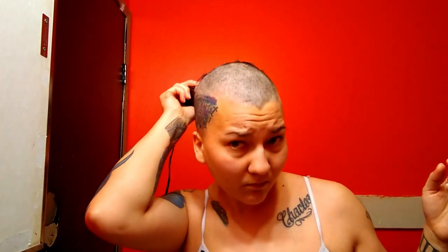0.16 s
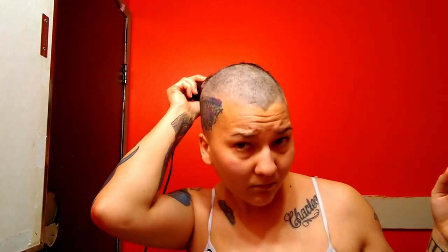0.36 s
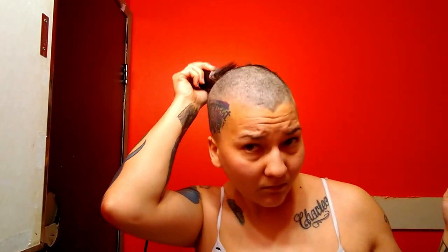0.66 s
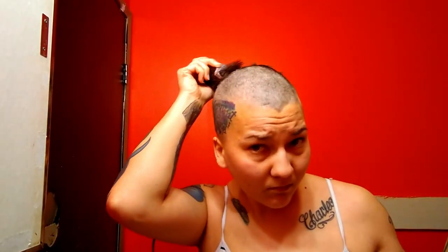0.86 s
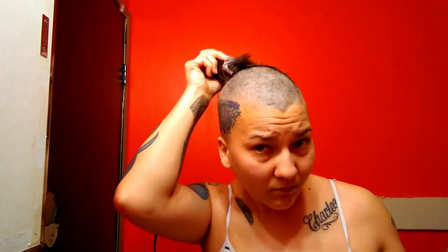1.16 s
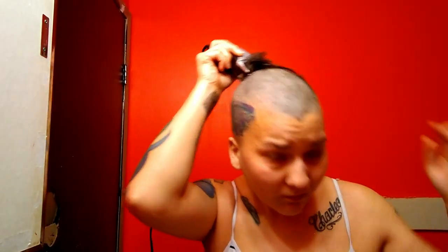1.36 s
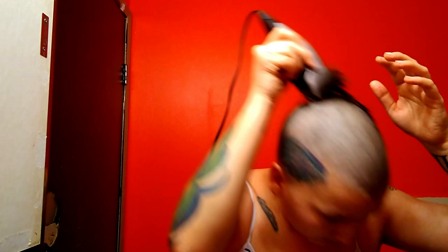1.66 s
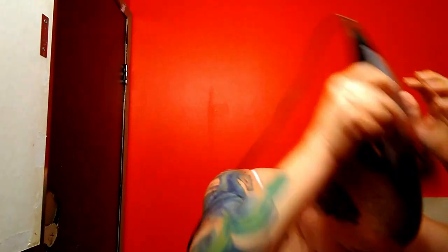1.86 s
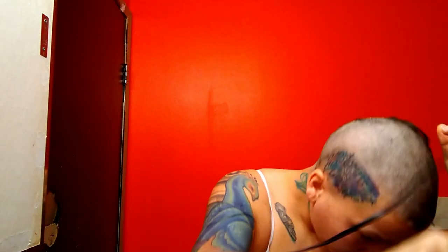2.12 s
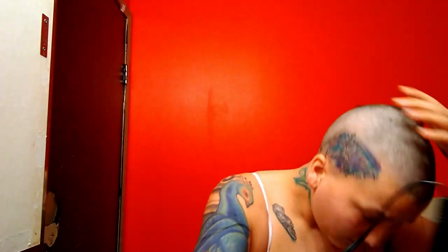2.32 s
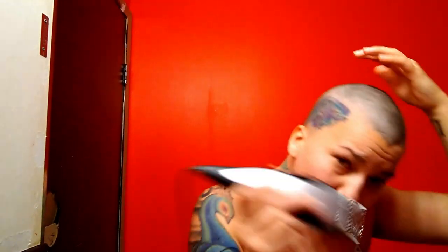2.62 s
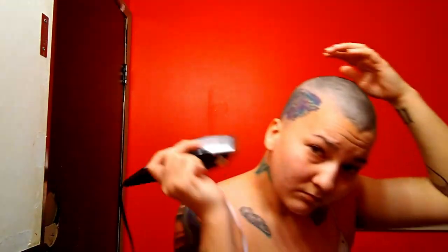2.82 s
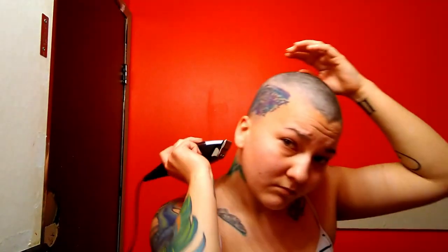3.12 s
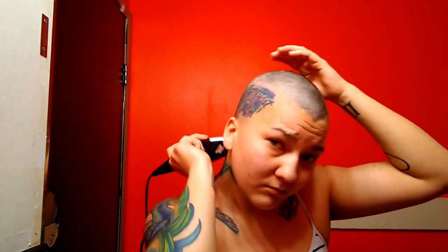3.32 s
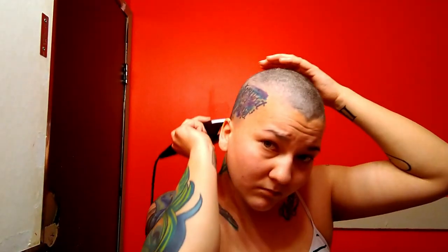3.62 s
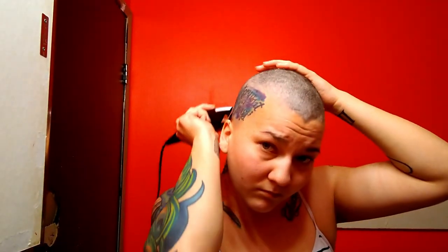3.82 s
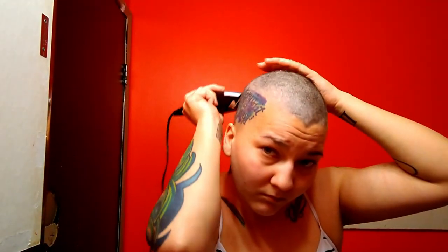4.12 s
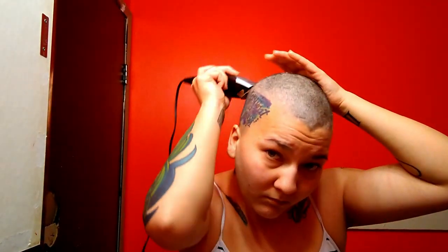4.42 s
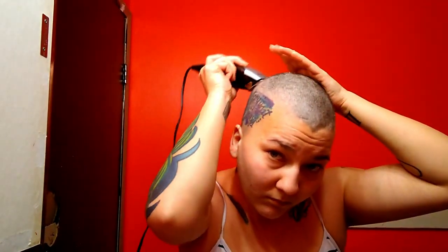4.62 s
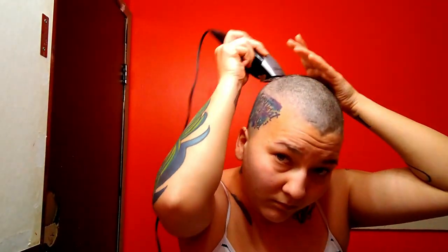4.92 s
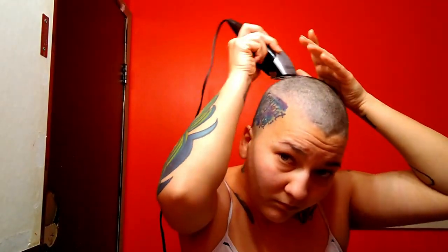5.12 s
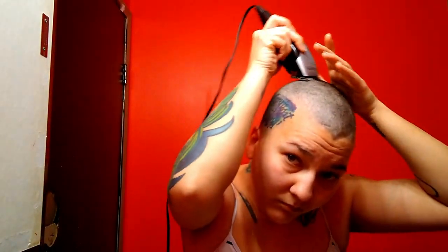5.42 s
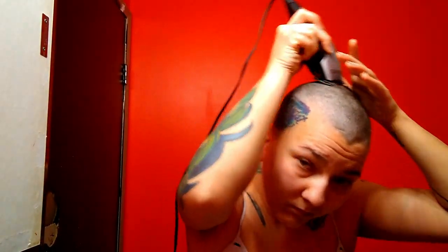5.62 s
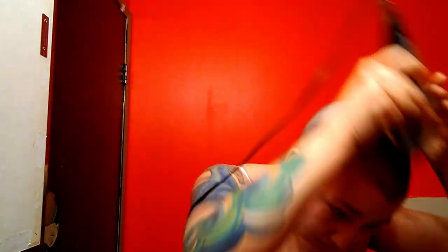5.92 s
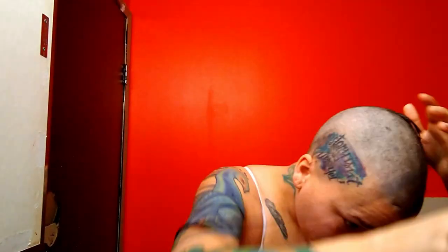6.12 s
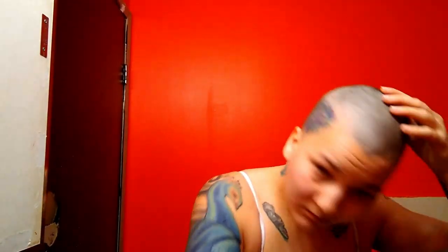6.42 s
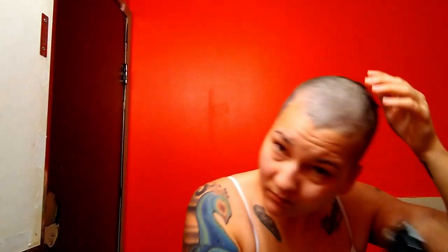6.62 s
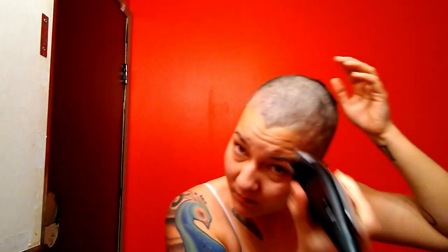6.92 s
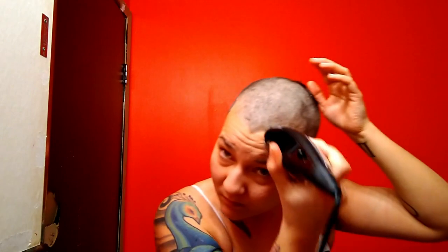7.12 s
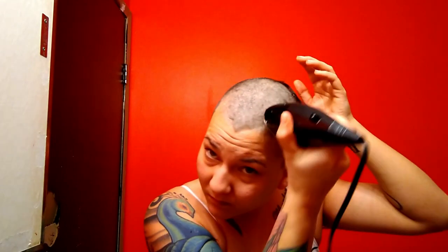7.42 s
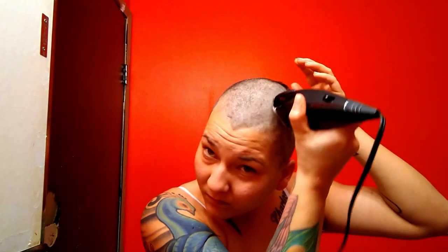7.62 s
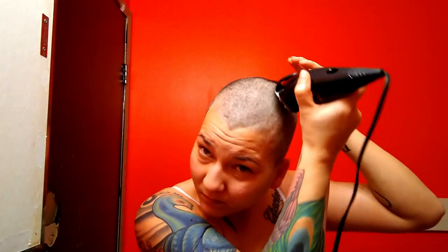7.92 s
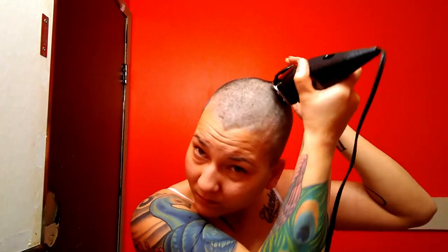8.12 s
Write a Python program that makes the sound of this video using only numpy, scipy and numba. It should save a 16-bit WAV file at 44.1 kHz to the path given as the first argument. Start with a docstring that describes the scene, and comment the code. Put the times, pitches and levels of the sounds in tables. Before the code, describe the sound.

Continuous mains-rate clipper buzz, plastic and nasal, with metallic hiss on top. It begins pressed and loud, thins during a swing with soft thuds around two to three seconds, then crackles and booms through another pass. After another swing it stays lighter and duller, with two faint bumps and renewed crackle near the end. Small room, short reflections, microphone a metre away.

```python
"""The buzz of a mains-driven hair clipper working over a scalp, heard a metre off in a small room by two
microphone ports. Its armature knocks out and back in every mains cycle and rings the plastic case, comb and blades.
Noise that swells with each stroke makes the blade hiss and the crackle of stubble in the teeth.
Sinking noise resonances make the soft thuds of cord or hand; echoes, walls and quiet air make the room."""
import sys
import numpy as np
from scipy import signal
from scipy.fft import rfft, irfft
from scipy.io import wavfile
from scipy.ndimage import uniform_filter1d, map_coordinates
from numba import njit

SR = 44100
rng = np.random.default_rng(int(sys.argv[2]) if len(sys.argv) > 2 else 0)


def inscribe(sig):
    """Save sig as 16-bit PCM at rate SR to the path in sys.argv[1].

    A 1-D sig is mono; a 2-D sig holds one channel per row.
    Samples are clipped to [-1, 1] before scaling.
    """
    pcm = np.round(np.clip(np.atleast_2d(sig).T, -1, 1) * 32767)
    wavfile.write(sys.argv[1], SR, pcm.astype(np.int16))


N = 364266
MAINS_HZ = 59.985
KNOCK_AT, SNIP_AT = .14, .15  # place of knock and blade sweep in the mains cycle (cycles)
RETURN = .95  # strength of the return stroke, scaled again by each user
BLADE_LEAD, STEEL_LEAD = .2, .12  # the blade end is struck this much before the case (cycles)


def undb(db):
    """dB to gain."""
    return 10 ** (np.asarray(db) / 20)


def unit(x):
    """Scale to rms 1."""
    return x / np.sqrt(np.mean(x ** 2))


def walk(rate):
    """Random levels that last 1 / rate s, smoothed twice into a slow wander of rms 1."""
    hold = int(SR / rate)
    steps = np.repeat(rng.standard_normal(N // hold + 1), hold)
    return unit(uniform_filter1d(uniform_filter1d(steps, hold), hold)[:N])


def span(start, length):
    """1 during a stretch of time, with soft edges."""
    fade_s = 0.02
    t = np.arange(N) / SR
    return np.clip(np.minimum(t - start, start + length - t) / fade_s + .5, 0, 1)


def swells(table):
    """Sum of bell-shaped lifts, each row (middle s, length s, height)."""
    t = np.arange(N) / SR
    return sum(height * np.exp(-(2 * (t - mid) / length) ** 2) for mid, length, height in table)


def curve(table, log=True):
    """A (Hz, value) table read at every frequency bin."""
    hz, value = np.transpose(table)
    bins = np.arange(N // 2 + 1) * SR / N
    if log:
        return np.interp(np.log(bins + 1), np.log(hz + 1), value)
    return np.interp(bins, hz, value)


def colour(x, table):
    """Filter by a (Hz, dB) spectrum."""
    return irfft(rfft(x) * undb(curve(table)), N)


@njit
def svf(x, hz, width):
    """Band-pass whose centre may move, gain 1 at the centre."""
    y, band, low = np.empty(len(x)), 0., 0.
    for i in range(len(x)):
        g, k = np.tan(np.pi * hz[i] / SR), width / hz[i]
        v = (band + g * (x[i] - low)) / (1 + g * (g + k))
        band, low, y[i] = 2 * v - band, low + 2 * g * v, k * v
    return y


def resonate(x, hz, width):
    """One steep resonance, the band-pass run twice, at rms 1."""
    return unit(svf(svf(x, hz, float(width)), hz, float(width)))


def ring(x, modes, waver_db):
    """Steep resonances side by side; grip and angle make each one waver slowly."""
    out = 0
    for k, (hz, width, db) in enumerate(modes):
        level = undb(db + waver_db * walk(3.737))
        # neighbours take opposite signs
        out = out + (-1) ** k * level * resonate(x, np.full(N, float(hz)), width)
    return unit(out)


# Spectrum of the room air. Each row: frequency in Hz, relative density in dB.
AIR_SPECTRUM = [(24, -53), (40, -48), (128, -9), (166, -28), (236, -4.5), (385, -7), (592, -4.5), (650, 6),
                (840, 0), (1430, -120)]
AIR_DB = -49


def air():
    """Quiet room noise, partly shared by the two ports."""
    mid, side = rng.standard_normal((2, N))
    both = [colour(mid + sign * .8 * side, AIR_SPECTRUM) * undb(2.5 * walk(6.0)) for sign in (1, -1)]
    return undb(AIR_DB) * unit(np.array(both))


@njit
def walls(x, lags, gain, damp):
    """Eight delay lines that feed each other, duller on every round."""
    line, soft, out = np.zeros((8, 4096)), np.zeros(8), np.zeros((2, len(x)))
    for i in range(len(x)):
        total = 0.
        for k in range(8):
            soft[k] += (1 - damp) * (gain[k] * line[k, (i - lags[k]) & 4095] - soft[k])
            total += soft[k]
            out[k % 2, i] += soft[k]
        for k in range(8):
            line[k, i & 4095] = x[i] + soft[k] - total / 4
    return out


# Early echoes off shoulder, arm and near wall. Each row: delay in s, level in dB.
EARLY_ECHOES = [(.00555, -14), (.0064, -15), (0.0118, -17)]
# The clipper is swung to a new place. Each row: start in s, length in s.
SWINGS = [(1.689, 1.41), (5.306, 0.98), (7.207, 0.46)]
DRIFT_S, SWING_S = 0.00003, 0.0003  # wander of the echo delays, held steady and extra when swung


def echoes(x):
    """Near echoes whose paths shift as the clipper moves, so that its harmonics trade strength."""
    swing = sum(span(*row) for row in SWINGS)
    out = x
    for delay, db in EARLY_ECHOES:
        path = delay + DRIFT_S * walk(1.85) + SWING_S * swing * walk(5.5)
        out = out + undb(db) * map_coordinates(x, [np.arange(N) - SR * path], order=1, mode="mirror")
    return out * np.std(x) / np.std(out)


# Soft thuds of cord or hand. Each row: time of the swell's top in s, level in dB,
# starting pitch in Hz, pitch it sinks towards in Hz, rise time in s.
THUDS = [(0.07, -58, 147, 90.5, 0.034), (0.51, -57, 143.4, 85, 0.084), (0.89, -50, 138, 81, 0.024),
         (1.387, -50, 113, 103, 0.03), (1.437, -44, 250, 220, 0.036), (1.961, -29.5, 860, 263, 0.021),
         (2.279, -59, 129.7, 101.3, 0.031), (2.5, -29.5, 1004, 250, 0.03), (2.5, -44, 170, 118, 0.022),
         (2.702, -26, 800, 524, 0.017), (2.749, -28.5, 630, 540, 0.012), (2.722, -44, 142, 86, 0.0303),
         (2.822, -54, 119, 100, 0.021), (2.843, -42, 275, 238, 0.0191), (2.913, -40, 347, 283, 0.015),
         (4.335, -44, 251, 147, 0.022), (4.802, -48, 204, 106, 0.054), (6.606, -32.5, 1500, 270, 0.024),
         (6.845, -36, 1080, 596, 0.018), (6.839, -50, 177, 113, 0.024)]


def thuds():
    """Soft grainy bumps: noise in a resonance that sinks from high to low, so the lows come late."""
    out, noise = np.zeros(N), rng.standard_normal((len(THUDS), SR // 4))
    for (s, db, high_hz, low_hz, length), burst in zip(THUDS, noise):
        t = np.arange(SR // 4) / SR / length
        hz = low_hz + (high_hz - low_hz) * np.exp(-.9 * t)
        swell = (t * np.exp(1 - t)) ** 1.6
        bump = .5 * resonate(burst, hz, .6 * low_hz + .4 * high_hz) * swell
        i = int((s - length) * SR)
        out[i:i + len(bump)] += undb(db) * bump
    return out


# Hum of the motor. Each row: multiple of the mains frequency, relative level in dB.
HUM_HARMONICS = [(1, -92.5), (3, -61.5), (4, -55.5), (5, -56.5), (6, -63), (7, -56), (8, -58.5), (9, -55)]


def hum():
    """The coil and armature hum on low multiples of the mains."""
    turn = 2 * np.pi * MAINS_HZ * np.arange(N) / SR
    return sum(undb(db + 1.5 * walk(3.23)) * np.sin(multiple * turn + rng.uniform(0, 2 * np.pi))
               for multiple, db in HUM_HARMONICS)


def knocks(back, scatter_db):
    """One knock out and a weaker one back in every mains cycle, each a little uneven."""
    jitter_s = 6e-6
    count = int(2 * MAINS_HZ * N / SR) - 1
    stroke = np.arange(count)
    chance = rng.standard_normal((count, 2))
    at = ((stroke / 2 + KNOCK_AT) / MAINS_HZ + jitter_s * chance[:, 0]) * SR
    i = at.astype(int)
    size = undb(np.broadcast_to(scatter_db, N)[i] * chance[:, 1])
    size = size * np.where(stroke % 2, -back, 1)  # the return pushes the other way
    out = np.zeros(N)
    # each knock is shared between two samples to place it exactly
    out[i], out[i + 1] = size * (1 - at + i), size * (at - i)
    return unit(out)


def smear(knock):
    """The same harmonics with scattered phases, slowly turning from one scatter to another."""
    order = np.round(np.arange(N // 2 + 1) * SR / N / MAINS_HZ).astype(int)
    a, b = (irfft(rfft(knock) * np.exp(2j * np.pi * rng.random(order[-1] + 1)[order]), N)
            for _ in range(2))
    turn = .6 * walk(2.5)
    return np.cos(turn) * a + np.sin(turn) * b


def rattle(knock, length_s, count):
    """Each knock sets off a chatter of small bounces that repeats, and slowly changes with the grip."""
    t = np.arange(int(4 * length_s * SR)) / SR
    bounces = rng.standard_normal((count, len(t))) * np.exp(-t / length_s)
    return unit(sum((.5 + walk(3.188)) * signal.fftconvolve(knock, b)[:N] for b in bounces))


def scrape(depth, grit_db):
    """Gritty noise that swells as the blade sweeps past the comb, out and back."""
    turn = 2 * np.pi * (MAINS_HZ * np.arange(N) / SR - SNIP_AT)
    swell = np.cos(turn / 2) ** 8 + .49 * RETURN * np.sin(turn / 2) ** 8
    grit = undb(grit_db * np.minimum(rng.exponential(size=N), 6))
    return unit((1 + depth * swell) * grit * rng.standard_normal(N))


def early(x, lead):
    """The same signal some mains cycles sooner."""
    return np.roll(x, -int(lead * SR / MAINS_HZ))


# The case is loud while pressed on the scalp, and the grip shifts its two strong modes.
# Each row: time in s, blade hiss level in dB, pressure on the case in dB, rest of the case
# in dB over the hiss, case ring in dB over the hiss, ring pitch in Hz, boom pitch in Hz.
HANDLING = [(0.0, -39, 20, -3, 7, 1300, 810), (0.02, -40, 8, 6, 8.5, 1325, 825),
            (0.34, -42.5, 5.5, 8, 12, 1320, 805), (1.01, -41, 6.5, 5, 12, 1295, 820),
            (1.47, -40.5, 4, 7, 16, 1276, 800), (1.72, -42.5, 3.5, 4, 5.5, 1210, 773),
            (1.84, -41.5, -4.5, -2, 0, 1300, 807), (2.0, -42, -3, 4, 2, 1270, 834),
            (2.07, -39, -3, 0, -3, 1295, 827), (2.35, -38.5, -1.5, 0.5, 6.5, 1260, 820),
            (2.46, -39, -3, 1, -6, 1280, 800), (2.51, -39, -1, -3, 6.5, 1200, 840),
            (2.57, -39, -6, -4, 1, 1260, 790), (2.69, -40.5, 1, 3, -14, 1240, 834),
            (2.78, -40, 5, -2, 10, 1270, 807), (2.9, -40.5, 1.5, 5.5, 0, 1200, 817),
            (2.97, -40, 0, -2, 9, 1263, 822), (3.15, -40, 3.5, 6, -4, 1260, 843),
            (3.24, -40, 2, 6, 9.5, 1210, 840), (3.31, -38.5, 4.5, 3.5, 0, 1340, 850),
            (3.38, -39.5, 0.5, 3, 8, 1310, 825), (3.95, -41, 1.5, 2.5, 8, 1306, 777),
            (4.09, -43, 10.5, 6.5, 10, 1282, 828), (4.35, -40, 8, 3.5, 15, 1309, 803),
            (5.06, -40.5, 7.5, 4, 12, 1254, 796), (5.29, -40, 4.5, 4, 8.5, 1292, 853),
            (5.36, -39, 2, -4, 11.5, 1270, 776), (5.5, -39.5, 3, 2, 5.5, 1292, 780),
            (5.57, -38.5, 5, 3.5, 8, 1260, 824), (5.77, -45, -2, 2.5, -3, 1300, 785),
            (6.0, -41, -5, 0.5, -3.5, 1235, 810), (6.3, -39.5, -4.5, 1.5, 3, 1247, 820),
            (6.585, -40.5, 2, 2, -7.5, 1250, 840), (6.605, -46, -4, 5, -10, 1290, 810),
            (6.67, -44, -7, -4, 2, 1313, 810), (7.08, -42, -4, -4.5, 4, 1316, 833),
            (7.45, -39.5, -11, -2.5, 2.5, 1264, 840), (7.7, -44, -1, -1.5, -2.5, 1320, 816),
            (7.84, -45, 0, -1, 1.5, 1320, 817), (8.26, -41.5, 4, 4, 3, 1270, 836)]
# Blades bite into stubble. Each row: start in s, length in s, added stubble share from 0 to 1,
# lift of the lower comb in dB, lift of the upper comb in dB.
CUTS = [(0.0, 0.62, 0.5, 0.5, 5), (0.599, 1.4, 0.34, -0.5, 4), (1.75, 0.17, 0.4, -1, -10),
        (2.65, 0.36, 0.35, 0, 3), (3.0, 0.32, 0.22, 0, -2), (3.3, 0.34, 0.97, -2, 1),
        (3.58, 0.4, 0.6, 6.5, -1), (4.049, 0.49, 0.26, -2.5, 1), (4.45, 1.04, 0.41, -2, -1),
        (5.68, 0.13, 0.54, 1.5, -34), (5.95, 0.15, 0.22, 4, 0), (7.198, 0.38, 0.86, -3, 3),
        (7.6, 0.41, 0.78, -3.5, -0.5)]
# A tuft jams in the teeth and the case ring changes roughly, mostly flaring.
# Each row: middle in s, length in s, lift in dB, added stubble share from 0 to 1.
TUFTS = [(3.36, .05, 4.5, .5), (3.502, 0.037, 2.5, .6), (3.582, 0.03, 5, 0.7), (3.63, .05, -7, 0),
         (3.772, 0.1, 4.5, 0.4), (3.98, 0.21, 3.5, 1), (7.248, 0.016, 5, 0.5), (7.47, .03, -1.5, 0.4)]
# The case boom is three close modes. Each row: offset from the boom pitch in Hz, width in Hz.
BOOM_MODES = [(-92.5, 62), (-23.5, 116), (67, 143)]
# The grip damps now one, now another of them.
# Each row: time in s, level of the low mode in dB, of the middle mode in dB, of the high mode in dB.
BOOM_LEVELS = [(0.0, -34.5, -35, -40), (0.2, -43.5, -39, -37.5), (1.15, -39.5, -42, -39),
               (1.38, -43, -45, -39), (1.61, -44, -40.5, -37.5), (1.89, -61, -49, -45),
               (2.02, -46, -51, -37), (2.81, -41, -48, -39), (2.97, -45, -35, -39), (3.08, -45, -59, -33.5),
               (3.22, -39.5, -43, -34.5), (3.57, -41, -45, -35.5), (3.75, -43.5, -44.5, -42),
               (4.35, -40, -38.5, -35.5), (5.08, -39, -40.5, -31.5), (5.29, -40, -40.5, -37.5),
               (5.38, -39, -57, -41), (5.52, -43, -44, -38), (5.61, -41, -49, -37), (5.75, -54, -59, -46),
               (6.53, -49, -55, -45), (6.79, -61, -53.5, -49.5), (7.84, -59, -51, -46),
               (8.26, -43, -39, -43)]
# The blade ring swells as the blade turns toward the microphones.
# Each row: middle in s, length in s, lift in dB.
BLADE_SWELLS = [(0.745, 1.45, 7.5), (1.4, 0.36, 4), (2.2, 0.42, 5.5), (2.517, 0.098, 6), (2.82, 0.16, 6),
                (3.2, 0.79, 4.5), (4.85, 0.94, 8), (6.17, 0.21, 5.5), (6.35, 0.07, 6), (6.8, 0.16, 6.5),
                (6.95, 0.16, 6)]
# The ring of the blade tips swells or dips. Each row: middle in s, length in s, lift in dB.
TIP_SWELLS = [(2.3, 0.55, 3), (3.4, .5, -6), (4.7, .6, 4), (5.35, 0.41, 10), (7.35, .35, 3)]
# The steel flares. Each row: middle in s, length in s, lift in dB.
STEEL_SWELLS = [(2.35, 0.44, 7.5), (3.24, 0.12, 6.5), (5.42, 0.39, 7), (6.53, 0.087, 7.5),
                (6.85, 0.54, 2.5)]
# Off the scalp or behind the head the knock arrives smeared over the cycle.
# Each row: start in s, length in s, smeared share from 0 to 1.
LOOSE = [(0, .5, .25), (1.75, 1.25, .75), (3.58, .5, .35), (5.3, .4, .5), (5.7, 2.6, .8)]
STUBBLE = .17  # share between cuts, 0-1
LOWER_DB, UPPER_DB, BLADE_DB, STEEL_DB = 3, -3, -4.5, -0.5  # base levels, clipper held in the air
LOWER_FOLLOWS, UPPER_FOLLOWS = 0.55, 0.54  # dB per dB of pressure
BLADE_HZ, BLADE_SAG_HZ = 2751, 10.8  # free pitch; sag per dB of pressure
TIP_HZ, TIP_DB = 4760, -6.5  # ring of the blade tips, over the hiss


def handling():
    """Pressure on the scalp lifts the comb and shifts the blade ring; cuts and tufts add crackle."""
    t = np.arange(N) / SR
    when, *columns = np.transpose(HANDLING)
    hiss_db, pressure_db, case_db, ring_db, ring_hz, boom_hz = (np.interp(t, when, c) for c in columns)

    biting = [span(start, length) for start, length, *_ in CUTS]
    stubble, lower_lift, upper_lift = np.array(CUTS)[:, 2:].T @ biting
    stubble = STUBBLE + stubble + swells([(mid, length, share) for mid, length, _, share in TUFTS])
    lower_db = LOWER_DB + LOWER_FOLLOWS * pressure_db + lower_lift
    upper_db = UPPER_DB + UPPER_FOLLOWS * pressure_db + upper_lift

    # each moving ring: level in dB over the hiss, Hz, width in Hz, share of crackle, lead in cycles
    when, *levels = np.transpose(BOOM_LEVELS)
    booms = [(np.interp(t, when, db) - hiss_db, boom_hz + offset, width, .5, 0)
             for db, (offset, width) in zip(levels, BOOM_MODES)]
    case_ring = (ring_db + swells([row[:3] for row in TUFTS]), ring_hz, 125., .6, -.06)
    tips = (TIP_DB + swells(TIP_SWELLS), np.full(N, float(TIP_HZ)), 170., .5, STEEL_LEAD)
    blade_hz = BLADE_HZ - BLADE_SAG_HZ * pressure_db
    blade = (BLADE_DB + swells(BLADE_SWELLS), blade_hz, 150., .4, BLADE_LEAD)

    steel_db = STEEL_DB + swells(STEEL_SWELLS)
    loose = np.clip(sum(share * span(start, length) for start, length, share in LOOSE), 0, 1)
    return hiss_db, case_db, lower_db, upper_db, steel_db, (*booms, case_ring, tips, blade), stubble, loose


# Ring of the teeth. Each row: frequency in Hz, width in Hz, relative level in dB.
TEETH_MODES = [(5990, 1040, 4), (7183, 750, 1.5), (8270, 1500, 5.5), (10470, 3000, 9.5), (11100, 3400, 13),
               (12700, 5100, 5)]
# Broad spectrum of the blade hiss. Each row: frequency in Hz, relative density in dB.
HISS_SPECTRUM = [(1470, -19.5), (2500, 0.5), (2720, -6), (3010, -10.5), (3770, -5.5), (4270, -13.5),
                 (4840, -8.5), (6600, -15.5), (11900, -13.5), (16000, -28.5)]
SCATTER_HZ = 4860  # above this the head scatters the hiss differently to each port


def blade_hiss(hiss_db, chatter):
    """Scrape and chatter ring the teeth and hiss broadly, with separate treble for each port."""
    flicker = undb(hiss_db + 0.95 * walk(70))
    shared = scrape(depth=0.33, grit_db=3.0) + 0.36 * early(chatter, STEEL_LEAD)
    high = signal.butter(1, SCATTER_HZ, "high", fs=SR)
    ports = []
    for _ in range(2):
        source = shared + 1.1 * signal.lfilter(*high, scrape(depth=1.5, grit_db=2.2))
        # the broad hiss runs one cycle ahead of the ringing teeth
        broad = unit(colour(early(source, 1), HISS_SPECTRUM))
        ports.append(ring(source, TEETH_MODES, waver_db=1.5) + 1.23 * broad)
    return 1.09 * flicker * np.array(ports)


# Modes of the plastic case. Each row: frequency in Hz, width in Hz, relative level in dB.
CASE_MODES = [(1017, 39, 1), (1132, 19, 4.5), (605.3, 28, -4), (1416, 44, -4.5)]
# Modes of the lower, then the upper comb. Each row: frequency in Hz, width in Hz, relative level in dB.
COMB_MODES = [(1661, 246, 7.5), (1690, 490, 4)], [(1895, 200, -1), (2006, 130, 2), (2233, 27, -11)]
# Modes of the steel. Each row: frequency in Hz, width in Hz, relative level in dB.
STEEL_MODES = [(2945, 260, -13), (3774, 156, 4), (4080, 3800, 0), (4728, 250, 7.5), (5310, 190, -2.5)]
SNAG_DB = 3.5  # extra spread of the knocks per unit of stubble share above one half


def clipper(hiss_db, case_db, lower_db, upper_db, steel_db, rings, stubble, loose):
    """Knocks, chatter and the crackle of cut stubble drive every resonance; the teeth add their hiss."""
    stubble = np.clip(stubble, 0, 1)
    # the case feels mostly the outward stroke
    crisp = knocks(.13 * RETURN, scatter_db=.4 + SNAG_DB * np.clip(stubble - .5, 0, 1))
    thump = np.sqrt(1 - loose) * crisp + np.sqrt(loose) * smear(crisp)
    chatter = rattle(knocks(.25 * RETURN, scatter_db=.5), length_s=.007, count=4)
    crackle = stubble * scrape(depth=0.035, grit_db=1.4)

    case = ring(thump + .35 * chatter + 1.1 * crackle, CASE_MODES, waver_db=1.)
    lower = ring(thump + .5 * chatter + 1.1 * crackle, COMB_MODES[0], waver_db=1.5)
    upper = ring(.9 * thump + .4 * chatter + 2.0 * crackle, COMB_MODES[1], waver_db=1.)
    steel_drive = early(.8 * thump + .6 * chatter, STEEL_LEAD) + 1.7 * crackle
    steel = ring(steel_drive, STEEL_MODES, waver_db=1.5)
    body = undb(case_db) * case + undb(lower_db + 4) * lower
    body = body + undb(upper_db + 6) * upper + undb(steel_db - 1) * steel

    for k, (db, hz, width, share, lead) in enumerate(rings):
        # ring and blade face the microphones and keep the sharp knock
        knock = thump if k < len(BOOM_MODES) else crisp
        drive = early(knock + .18 * chatter, lead) + share * crackle
        body = body + (-1) ** k * undb(db) * resonate(drive, hz, width)

    # the hum spreads round the head
    body = undb(hiss_db) * body + undb(1.9 * (hiss_db - hiss_db.mean())) * hum()
    return body, blade_hiss(hiss_db, chatter)


# Phase between the ports. Each row: frequency in Hz, lead of the left port in radians.
PORT_PHASE = [(0, 0), (1030, 0.2), (1640, -2.5), (3530, -6.6), (3880, -8.8), (4570, -9.8), (6370, -15.7),
              (6890, -16.1), (7320, -18.4), (8960, -22.7), (9470, -25.5), (9910, -25.6), (13300, -35.2),
              (15800, -27.5)]
# Level between the ports. Each row: frequency in Hz, left minus right in dB.
PORT_LEVEL = [(60, -5), (110, 0), (200, 3), (380, -2), (700, -1), (1290, -2.5), (2380, -3.5), (4400, 0.5),
              (8120, 0.5), (15000, -10)]
ROOM_T60_S, ROOM_DAMP, ROOM_DB = 0.41, 0.14, -19  # decay before damping, damping per round, level


def scene():
    """The clipper reaches the right port first, then the walls return it to both."""
    body, teeth = clipper(*handling())
    near = echoes(body) + thuds()
    # each port takes half of the level and phase difference
    half = undb(curve(PORT_LEVEL) / 2) * np.exp(.5j * curve(PORT_PHASE, log=False))
    direct = np.array([irfft(rfft(near + own) * h, N) for own, h in zip(teeth, (half, 1 / half))])
    lags = np.array([331, 457, 569, 683, 797, 941, 1087, 1259])  # samples
    room = walls(near + teeth[0], lags, undb(-60 * lags / SR / ROOM_T60_S), ROOM_DAMP)
    return direct + undb(ROOM_DB) * room + air()


def record(dry):
    """The recorder rolls off the deep bass below 52 Hz and cuts the top above 15850 Hz."""
    dry = signal.sosfilt(signal.butter(4, 52, "high", fs=SR, output="sos"), dry)
    return signal.sosfilt(signal.ellip(10, .2, 70, 15850, fs=SR, output="sos"), dry)


dry = scene()
out = record(dry)
inscribe(out)
```